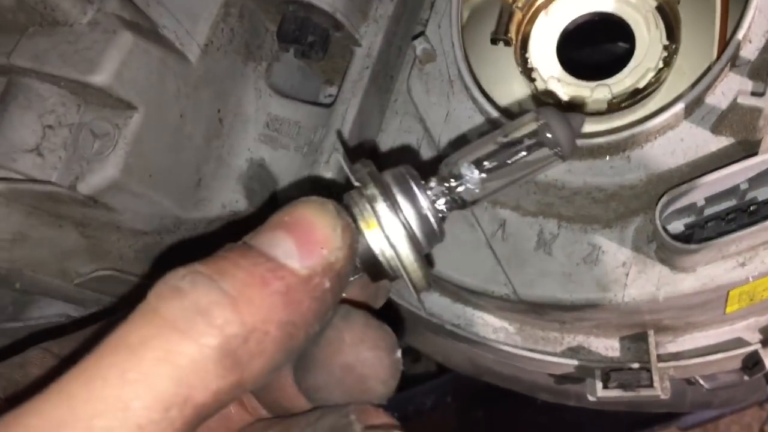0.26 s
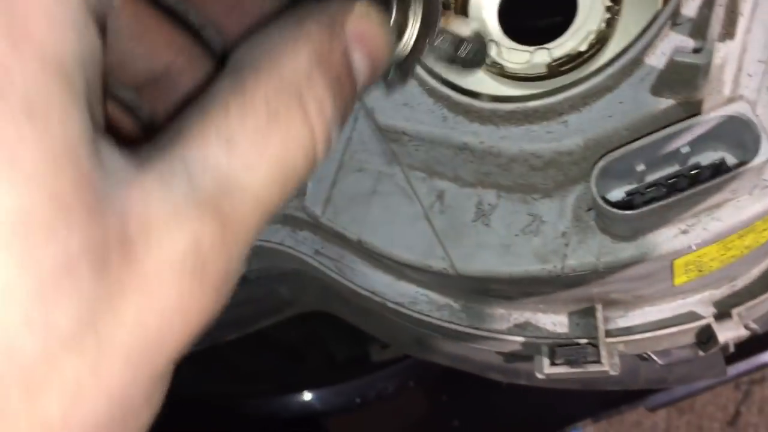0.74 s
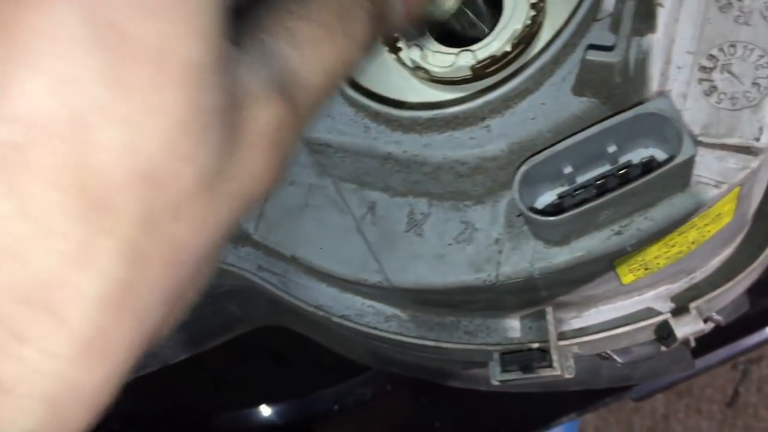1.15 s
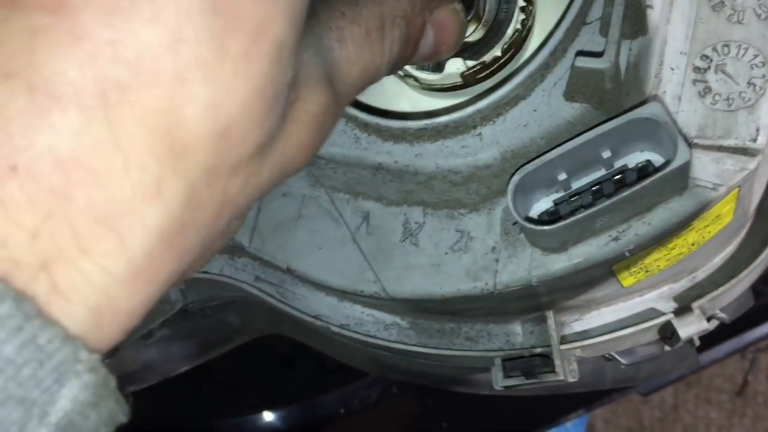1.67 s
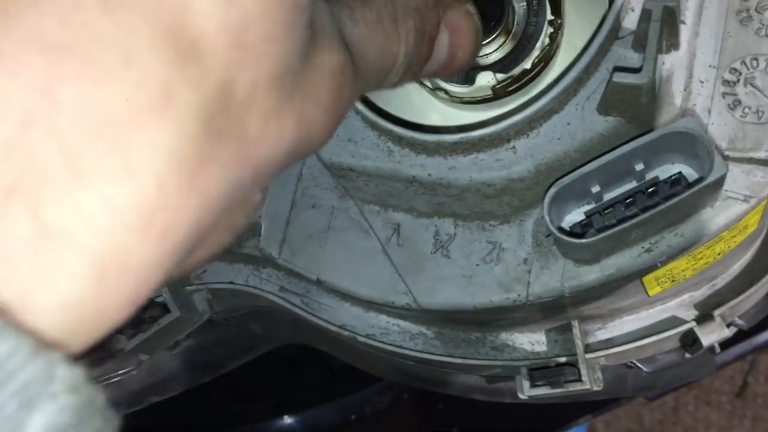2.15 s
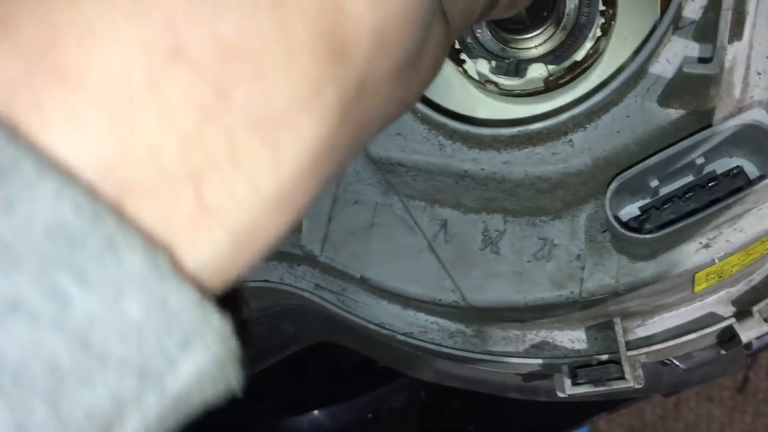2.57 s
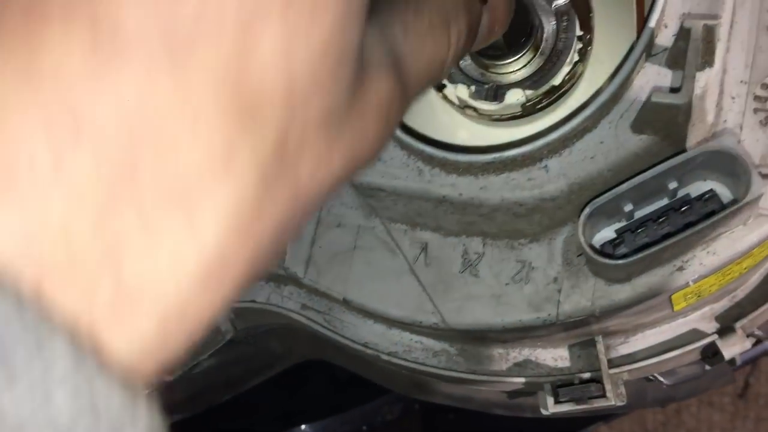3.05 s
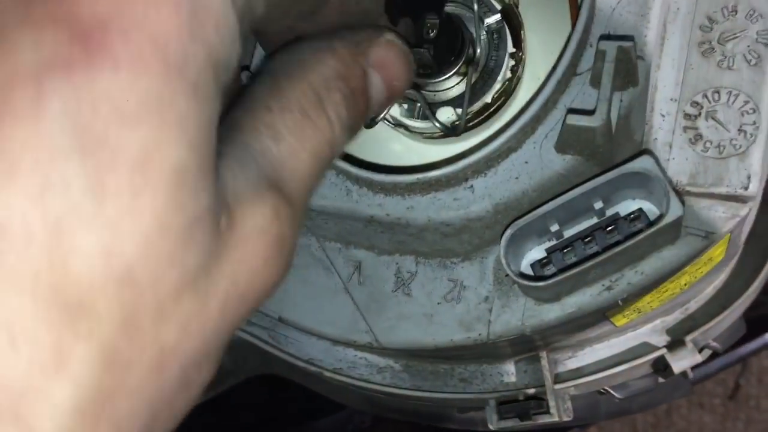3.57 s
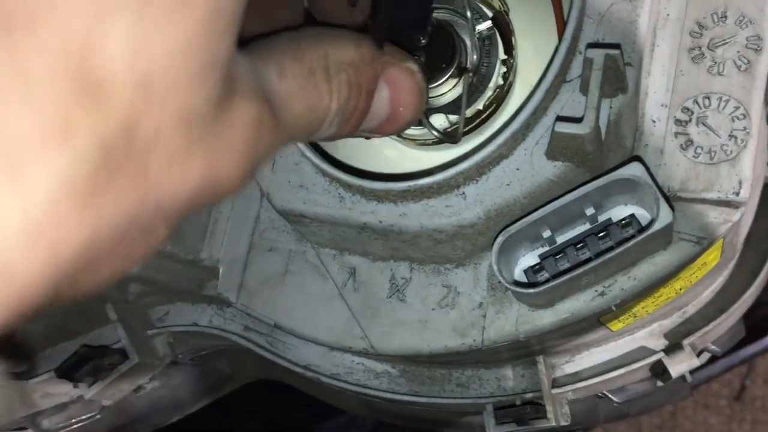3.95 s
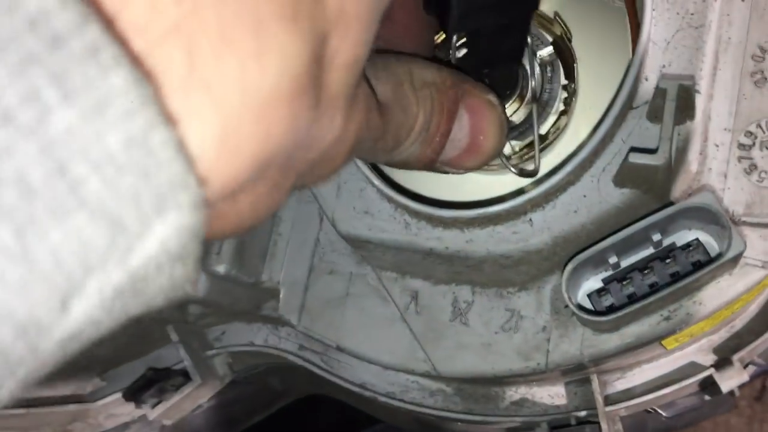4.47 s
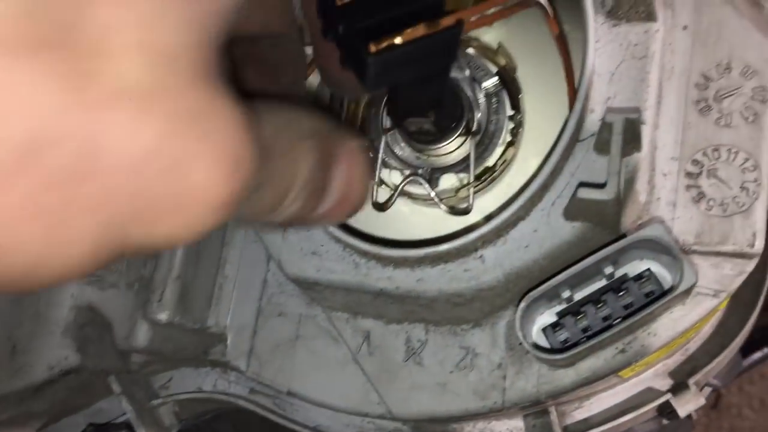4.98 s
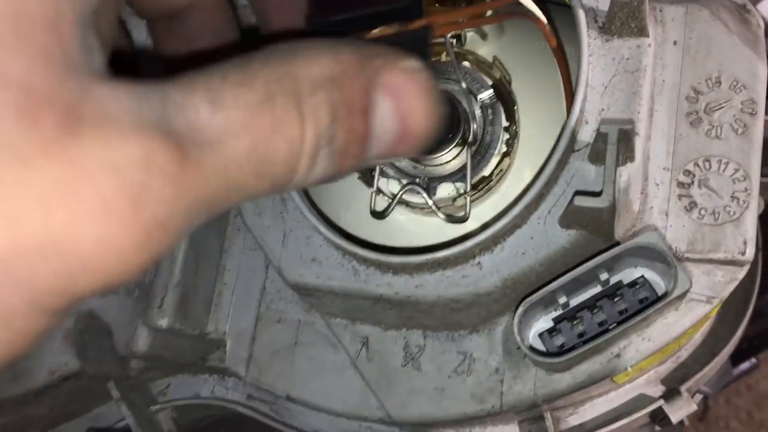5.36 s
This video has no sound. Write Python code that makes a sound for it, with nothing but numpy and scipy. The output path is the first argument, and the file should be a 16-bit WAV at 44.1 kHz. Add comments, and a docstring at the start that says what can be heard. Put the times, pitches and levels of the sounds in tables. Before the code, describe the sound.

Fingers work a bulb into a plastic headlamp housing, heard close up in a quiet room. Small clicks, taps and soft scuffs come in uneven clusters, with light tinks from the metal base and dull knocks as the hollow housing rocks. After a busy stretch of scraping and clicking, a wire clip snaps sharply with a faint twang. A few faint ticks follow.

```python
"""Seating a bulb in a headlamp

Fingers work a bulb into a plastic housing on a carpet, close to a phone in a quiet room.
Taps and soft scuffs ring the socket, reflector, wire clip and hollow shell. The bulb's metal flange
tinks, a wire spring twangs, a finger squeaks; between contacts the parts rub and the housing rocks."""
import sys
import numpy as np
from scipy import signal
from scipy.fft import rfft, irfft, next_fast_len
from scipy.io import wavfile
from scipy.ndimage import uniform_filter1d, map_coordinates

SR = 44100
rng = np.random.default_rng(int(sys.argv[2]) if len(sys.argv) > 2 else 0)


def dump(signal):
    """Clip the signal to [-1, 1] and save it as 16-bit WAV at the path in sys.argv[1]."""
    limited = np.clip(np.atleast_2d(signal).T, -1, 1)
    pcm = np.round(limited * 32767).astype(np.int16)
    wavfile.write(sys.argv[1], SR, pcm)


N = 247842

# sharp taps: start_s, level_db, hardness_db, shell_db, socket_db, base_rattle_t60_s
TAPS = [(0.7955, -16, -35, 0.5, 0.5, 0.017), (1.0452, -21.5, -3, -13.5, -13, 0.019),
        (1.1525, -30.5, -1, -18, -12.5, 0.24), (1.1823, -30.5, 2, -14.5, -15.5, 0.092),
        (1.2471, -13.5, -13, -18.5, -12, 0.08), (1.3445, -44, 2, 12.5, 2, 0.062),
        (1.367, -36, 15, 4, 3.5, 0.033), (1.3813, -23.5, -30, -6.5, -5.5, 0.039),
        (1.4618, -47.5, 19.5, 14, 8, 0.04), (1.503, -54.5, -15, 17.5, 6, 0.03),
        (1.5343, -31.5, -12.5, -5, -1, 0.0637), (1.55, -40.5, 2, 9.5, -14, 0.031),
        (1.6415, -22, 3, -1, -1, 0.031), (1.8272, -35, -46.5, -7, 0.5, 0.022),
        (2.074, -55.5, -19, 6, 1.5, 0.093), (2.1129, -23.5, -5, -7, -2, 0.029),
        (2.13, -25, -11, -12, -13.5, 0.06), (2.166, -35.5, 11, 2.5, -7, 0.089),
        (2.1955, -15.5, 4, -13, -8.5, 0.073), (2.2285, -23.5, 5, -7, -8, 0.083),
        (2.318, -51.5, 3, 6, -7.5, 0.087), (2.802, -40.5, 9, 1.5, 4, 0.033),
        (2.8495, -43.5, -8, -32, -25, 0.24), (2.938, -52, 3, -30, -25, 0.044),
        (2.9874, -45, -0.5, -41.5, -38, 0.22), (3.0008, -44, -9.5, -30, -19, 0.098),
        (3.016, -28.5, -10, -30.5, -22, 0.056), (3.2526, -46, -9, 10.5, 7.5, 0.044),
        (3.3637, -25.5, 8, -24.5, -16, 0.14), (3.4231, -25.5, -2, 1, -4.5, 0.043),
        (3.4278, -10, -6.5, -12.5, -7.5, 0.04), (3.4455, -28.5, 10.5, -5, -5.5, 0.14),
        (3.5542, -27.5, 13.5, -9.5, -20.5, 0.087), (3.561, -18.5, 8.5, -37.5, -21, 0.14),
        (3.7883, -34, -3.5, -33, -19.5, 0.042), (3.8714, -32.5, -2.5, -3, -2, 0.045),
        (3.958, -49, -33, 10, 7.5, 0.1), (3.9955, -32.5, 4.5, -20, -9.5, 0.0625),
        (4.0788, -36.5, -2, -26, -13.5, 0.028), (4.0943, -28, -13.5, -26, -14, 0.08),
        (4.1298, -35, -5.5, -17, -9, 0.067), (4.185, -22.5, 0.5, -28, -11, 0.082),
        (4.5849, -5, 2.5, -14, -6.5, 0.037), (4.607, -21, -4.5, -13.5, -12.5, 0.091),
        (5.3093, -33, 4, -9.5, -16, 0.019), (5.383, -48, -5, -3, -4.5, 0.025),
        (5.5393, -33.5, 0, -12.5, -12, 0.0314)]
# resonances of each part: pitch_hz, relative_db, t60_s
SOCKET_MODES = [(1675, -5.5, 0.013), (1985, -4, 0.014), (2154, -2.5, 0.0097), (2400, 1, 0.013),
                (2796, -2, 0.0072), (3220, -4, .02), (3940, -1, 0.004)]
CLIP_MODES = [(8190, -2, 0.0045), (9045, -1, 0.0068), (9600, -3, .005), (11110, -0.5, 0.0035),
              (12400, -2, .007), (13500, -0.5, .005), (14700, -1.5, .005), (15400, -5.5, 0.002)]
REFLECTOR_MODES = [(4490, -2, 0.0039), (4616, -6.5, 0.024), (5050, -3, 0.0058), (5740, -0.5, 0.008),
                   (6020, -4, 0.016), (6770, -0.5, 0.0042)]
SHELL_MODES = [(590.5, -7, 0.044), (600.5, -8, 0.03), (710, -6.5, .02), (792.6, -7, 0.028),
               (833.3, -1.5, 0.02), (1041.4, -4.5, 0.042), (1067, -2.5, 0.013), (1332, -2.5, .012)]
THUD_MODES = [(62, -16, .1), (112.8, 3, .17), (201, 0, .09), (250, 1.5, 0.035), (288.6, -2.5, 0.14),
              (415, -5.5, 0.033)]  # the low end of the hollow housing

TICK_DB, TICK_SAMPLES = 2.2, 40  # unevenness and length of the slips within a touch
MIDDLE_TAP_DB, ATTACK_DB_PER_DB = -25, .3  # taps above the middle level gain extra attack


def amp(db):
    """Gain of a level in dB."""
    return 10 ** (np.asarray(db) / 20)


def along(points, hz):
    """A curve through (Hz, value) points on a log frequency axis."""
    point_hz, values = np.transpose(points)
    return np.interp(np.log(hz + 1), np.log(point_hz + 1), values)


def add(out, start_s, sound):
    """Mixes a sound in from start_s."""
    place = out[round(start_s * SR):][:len(sound)]
    place += sound[:len(place)]


def filtered(x, response):
    """Colours x with a frequency response scaled to unit energy."""
    size = next_fast_len(len(x) + 512, True)
    curve = response(np.fft.rfftfreq(size, 1 / SR))
    return irfft(rfft(x, size) * curve / np.sqrt(np.mean(np.abs(curve) ** 2)), size)[:len(x)]


def ring(force, modes, detune=0, vary_db=0):
    """A force drives damped modes; the grip of the fingers shifts and weights them."""
    hz, db, t60 = np.transpose(modes)[:, :, None]
    grip = rng.standard_normal((2, len(modes), 1))
    hz = hz * (1 + detune * grip[0])
    polarity = np.cos(np.pi * np.arange(len(modes)))[:, None]
    gain = polarity * amp(db + vary_db * grip[1])
    width_hz = np.log(1000) / np.pi / t60
    return filtered(force, lambda f: np.sum(gain * 1j * f / (hz**2 - f**2 + 1j * f * width_hz), axis=0))


def slips(size):
    """Friction noise of rms 1, broken into small ticks of uneven size."""
    tick_gains = amp(TICK_DB * rng.exponential(size=size // TICK_SAMPLES + 1))
    ticks = np.repeat(tick_gains, TICK_SAMPLES)[:size]
    return ticks / np.sqrt(np.mean(ticks ** 2)) * rng.standard_normal(size)


def even(force, width_hz=300):
    """Levels a force's spectrum so that it pushes all pitches alike, and fades its end."""
    spectrum = rfft(force)
    humps = uniform_filter1d(np.abs(spectrum) ** 2, max(round(width_hz * len(force) / SR), 1))
    fade = np.clip(np.linspace(4, -1, len(force)), 0, 1)
    return fade * irfft(spectrum * np.sqrt(humps.mean() / (np.abs(humps) + 1e-20)), len(force))


def hush():
    """A steady bed of room tone and microphone hiss."""
    # noise colour: frequency_hz, relative_db
    colour = [(20, -21.5), (60, -3), (200, -7), (500, -13.5), (5000, -21), (15900, -28)]
    top_hz = colour[-1][0]
    return amp(-70) * filtered(rng.standard_normal(N), lambda hz: amp(along(colour, hz)) * (hz < top_hz))


def room(near):
    """A short, diffuse echo whose highs die first; its noise tail is drawn afresh each quarter second."""
    # room decay: frequency_hz, t60_s
    decay = [(150, 0.26), (1500, 0.11), (6000, 0.067), (15000, 0.016)]
    out, step = np.zeros(N), SR // 4
    for start in range(0, N, step):
        hz, t, noise = signal.stft(rng.standard_normal(SR // 3), SR, nperseg=256)
        _, tail = signal.istft(noise * amp(-60 * t / along(decay, hz)[:, None]), SR, nperseg=256)
        echo = signal.fftconvolve(near[start:start + step], tail / np.linalg.norm(tail))
        add(out, (start + 300) / SR, echo)  # 7 ms pre-delay
    return out


def grit(times_s, level_db, spike_db, clump_db, clump_hz=70):
    """The force of a rub: tiny slips of uneven size, in clumps."""
    t = np.arange(N) / SR
    clumps = map_coordinates(rng.standard_normal(int(N * clump_hz / SR) + 4), [t * clump_hz])
    grains = rng.standard_normal(N) * amp(spike_db * rng.exponential(size=N) + clump_db * clumps)
    return amp(np.interp(t, times_s, level_db, left=-120)) * grains / np.std(grains)


def rubbing():
    """Fine friction rings the bright parts, coarse friction the darker ones; the housing rocks below."""
    # level envelopes: time_s, fine_db, coarse_db, rocking_db
    envelopes = [(0.9, -102, -91.5, -74.5), (1.1, -66, -60.5, -86), (1.27, -62, -64.5, -69.5),
                 (1.5, -67.5, -55, -54), (1.8, -87, -88, -65.5), (2.08, -80, -82, -69),
                 (2.2, -56.5, -53, -50.5), (2.3, -73, -72, -64), (2.6, -97, -74, -93.5),
                 (2.95, -67, -73, -72), (3.1, -64, -70, -86.5), (3.2, -45, -67, -81), (3.32, -77, -66, -64),
                 (3.45, -56, -62.5, -58), (3.63, -71.5, -76.5, -82), (3.83, -76, -74, -62),
                 (4.05, -68, -65.5, -55), (4.34, -90.5, -81, -69.5), (4.82, -80.5, -79, -60),
                 (5.07, -73.5, -67.5, -74.5), (5.62, -101.5, -86.5, -75.5)]
    times_s, fine_db, coarse_db, rocking_db = np.transpose(envelopes)
    fine = ring(grit(times_s, fine_db, spike_db=-0.2, clump_db=1), REFLECTOR_MODES + CLIP_MODES)
    coarse = ring(grit(times_s, coarse_db, spike_db=-0.7, clump_db=6.5), SHELL_MODES + SOCKET_MODES)
    rocking = ring(grit(times_s, rocking_db, spike_db=0, clump_db=5), THUD_MODES[:4])
    return fine + coarse + rocking


def finger_squeaks():
    """A finger sticks and slips on the plastic: short tones that swell, sag a little and waver."""
    # squeaks: start_s, length_s, level_db, pitch_hz, octave_db
    squeaks = [(1.442, 0.019, -40, 1680, -8), (1.626, 0.015, -32, 1350, -14)]
    out = np.zeros(N)
    for start_s, length_s, db, hz, octave_db in squeaks:
        progress = np.linspace(0, 1, round(length_s * SR))
        waver = np.repeat(rng.normal(0, .04, len(progress)), TICK_SAMPLES)[:len(progress)]
        phase = 2 * np.pi * np.cumsum(hz * (1.02 - 0.056 * progress + waver)) / SR
        tone = np.sin(phase) + amp(octave_db) * np.sin(2 * phase)
        add(out, start_s, amp(db) * np.sin(np.pi * progress) * tone)
    return out


def housing_thuds(push_t60_s=0.0027, boom_lag_s=.008):
    """A short, rough push onto the carpet knocks the hollow housing; its deep boom follows."""
    # pushes: start_s, boom_db, knock_db
    bumps = [(0.795, -61.5, -45.5), (1.249, -49, -44.5), (1.342, -42, -34.5), (1.376, -37.5, -30.5),
             (1.461, -45.5, -43.5), (1.54, -32.5, -43), (1.657, -43, -43.5), (1.954, -54.5, -65.5),
             (2.131, -42.5, -45), (2.193, -29.5, -31.5), (2.227, -34.5, -38.5), (2.414, -53, -55),
             (2.794, -47.5, -55.5), (3.251, -46.5, -48), (3.388, -46, -41), (3.43, -34, -25),
             (3.455, -26, -34), (3.56, -44.5, -47), (3.792, -50, -61.5), (3.873, -45, -47),
             (4.104, -43, -49.5), (4.187, -36, -41), (4.458, -52.5, -51), (4.583, -26.5, -25),
             (4.604, -33, -32), (4.72, -41.5, -50)]
    out, t = np.zeros(N), np.arange(SR // 4) / SR
    for start_s, boom_db, knock_db in bumps:
        push = amp(-60 * t / push_t60_s) * (0.8 + 0.2 * rng.standard_normal(len(t)))
        add(out, start_s + boom_lag_s, amp(boom_db) * ring(push, THUD_MODES[:2], detune=.02))
        add(out, start_s, amp(knock_db) * ring(push, THUD_MODES[2:], detune=.02, vary_db=2))
    return out


def spring_twangs(buzz_t60_s=.2):
    """The wire spring snaps free and rings on faintly, buzzing against its seat."""
    # wire resonances, the long-ringing pair first: pitch_hz, relative_db, t60_s
    modes = [(1365, 0, .5), (1352, -5, .3), (794, 0, .16), (2820, -8, .16), (2740, -9, .2), (4320, -8, .14)]
    # releases: start_s, pair_db, other_modes_db
    twangs = [(1.641, -23, -37), (2.229, -30, -30), (4.586, -21.5, -5.5)]
    out, t = np.zeros(N), np.arange(SR // 2) / SR
    snap = t == 0
    for start_s, pair_db, others_db in twangs:
        buzz = snap + 0.04 * amp(-60 * t / buzz_t60_s) * slips(len(t))
        add(out, start_s, amp(pair_db) * ring(snap, modes[:2]) + amp(others_db) * ring(buzz, modes[2:]))
    return out


def flange_tinks(shiver_t60_s=.04):
    """Point touches ring the thin metal flange, which shivers on its seat, so the ring is uneven."""
    # flange resonances: pitch_hz, relative_db, t60_s
    modes = [(2430, 0, .09), (3060, -8, .06), (6480, -6, .065), (7330, -10, .06), (8400, 0, .05),
             (12300, -9, .03), (14815, 0, .09)]
    # touches and their drive to the low, middle and top modes: start_s, low_db, middle_db, top_db
    tinks = [(0.8, -57, -48, -66), (1.2471, -46, -21.5, -54), (1.344, -54, -40.5, -37),
             (1.381, -58, -39, -53), (2.133, -50, -53.5, -38), (2.168, -39.5, -37.5, -39.5),
             (2.1973, -40, -26.5, -26), (2.227, -31, -38, -46), (3.405, -56, -35.5, -61),
             (3.427, -32, -23, -50.5), (3.4443, -52, -29, -21)]
    groups = modes[:1], modes[1:-1], modes[-1:]
    out, t = np.zeros(N), np.arange(SR // 4) / SR
    for start_s, *levels_db in tinks:
        force = (t == 0) + 0.12 * amp(-60 * t / shiver_t60_s) * slips(len(t))
        for db, group in zip(levels_db, groups):
            add(out, start_s, amp(db + 23.5) * ring(force, group, detune=0.0025, vary_db=2.5))
    return out


def tap_cracks(t60_s=0.0067, centre_hz=4000):
    """Each tap opens with a brief, unpitched snap of noise."""
    out, t = np.zeros(N), np.arange(600) / SR
    for start_s, db, *_ in TAPS:
        snap_db = db - 10.5 + ATTACK_DB_PER_DB * (db - MIDDLE_TAP_DB)
        snap = amp(snap_db - 60 * t / t60_s) * rng.standard_normal(len(t))
        add(out, start_s, filtered(snap, lambda f: 1j * f / (centre_hz + 1j * f) ** 2))
    return out


def touches(modes, samples, part_db, rattle_stretch, hardness=0, shell=0, socket=0):
    """One part rings to taps (a blow, then a dying rattle) and swelling scuffs, each with a new grip."""
    # soft scuffs: near_peak_s, level_db, hardness_db, shell_db, socket_db, rise_s
    scuffs = [(0.547, -60.5, 2.5, -31, -3.5, 0.013), (0.898, -62, -7, -20, -7, 0.014),
              (1.123, -35, -6.5, -14.5, -10.5, 0.017), (1.2, -35.5, -4, -14, -11, 0.025),
              (1.4074, -45, -6, 12.5, 3, 0.0074), (1.4432, -54, -1, 11, 3, 0.01),
              (1.6276, -52, 2, 8, -12, 0.013), (1.8631, -55.5, -37, 7.5, 8.5, 0.0053),
              (2.152, -42.5, -1.5, 2.5, 3, 0.009), (2.185, -37, -5.5, 1, -1.5, 0.0096),
              (2.42, -64, -30.5, 21, 17, 0.0079), (2.564, -71.5, 5, 19.5, -5, 0.013),
              (2.707, -52.5, -11, 2.5, 0, 0.012), (2.7408, -52, -3, -2, 4.5, 0.021),
              (2.78, -35.5, -13, -15, -6, 0.014), (2.891, -36, -12.5, -23.5, -18, 0.012),
              (2.9184, -39.5, -24, -47, -30, 0.014), (3.066, -44.5, -32, -49, -30, 0.011),
              (3.144, -37, 7, -26, -11.5, 0.009), (3.1869, -35, -1, -27, -11.5, 0.015),
              (3.22, -34.5, -3.5, -20, -11, 0.013), (3.403, -37.5, 12, -13, -7, 0.005),
              (3.541, -38, 1.5, -17, -15, 0.0094), (3.573, -21, -5, -39, -16, 0.013),
              (3.7614, -29.5, -4.5, -31, -16.5, 0.0042), (3.985, -36, 2, -7, -5, 0.0057),
              (4.107, -42.5, -1.5, -7, -5.5, 0.0045), (4.176, -38, -18, -13, -16, 0.016),
              (4.4582, -49.5, -5.5, -6, -14, 0.0048), (4.5426, -52, -7, -15.5, -14, 0.022),
              (4.72, -48, 0, -4, -5, 0.008), (4.746, -40.5, -10.5, -13, -11.5, 0.0099),
              (4.83, -67.5, -16.5, 8, 6, 0.019), (4.959, -39.5, -16, -26, -14.5, 0.013),
              (4.984, -54.5, -10, -12, -9, 0.0043), (5.174, -48.5, -8, 0, 4.5, 0.012)]
    out, t = np.zeros(N), np.arange(samples) / SR

    def touch(start_s, force, db, trims_db):
        gain = amp(part_db + db + np.dot([hardness, shell, socket], trims_db))
        add(out, start_s, gain * ring(even(force), modes, detune=.015, vary_db=2))

    for start_s, db, *trims_db, t60_s in TAPS:
        blow = 4 * amp(ATTACK_DB_PER_DB * (db - MIDDLE_TAP_DB)) * (t == 0)
        rattle = amp(-60 * t / (np.clip(t60_s, .005, .2) * rattle_stretch)) * slips(samples)
        touch(start_s, blow + rattle, db, trims_db)
    for near_peak_s, db, *trims_db, rise_s in scuffs:
        swell = (t / rise_s * np.exp(1 - t / rise_s)) ** 2
        touch(near_peak_s - 0.85 * rise_s, swell * slips(samples), db, trims_db)
    return out


def taps_and_scuffs():
    """Every touch reaches the four parts, each with its own strength."""
    reflector = touches(REFLECTOR_MODES, samples=4000, part_db=-10, rattle_stretch=0.73)
    clip = touches(CLIP_MODES, samples=3500, part_db=-5.5, rattle_stretch=0.51, hardness=0.71)
    socket = touches(SOCKET_MODES, samples=4500, part_db=-5, rattle_stretch=1.13, socket=1)
    shell = touches(SHELL_MODES, samples=6000, part_db=-3.5, rattle_stretch=1.16, shell=1)
    return reflector + clip + socket + shell


def scene():
    """Close handling and its echo over the hush, in mono."""
    near = taps_and_scuffs() + tap_cracks() + housing_thuds() + rubbing()
    near += flange_tinks() + spring_twangs() + finger_squeaks()
    return (near + amp(-10.5) * room(near) + hush())[None]


def record(dry):
    """The phone clips softly at full scale, thins the deep bass and rolls off to a hard top limit."""
    clipped = dry / (1 + np.abs(dry) ** 8) ** (1 / 8)
    hz = np.fft.rfftfreq(N, 1 / SR)
    colour = amp(along([(20, -10), (60, 0), (15800, 0), (16100, -14)], hz))
    return irfft(rfft(clipped) * colour * (hz < 16700), N)


dry = scene()
out = record(dry)
dump(out)
```